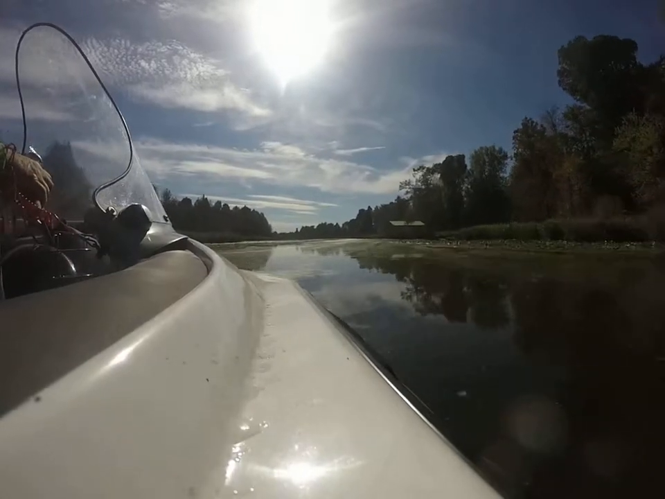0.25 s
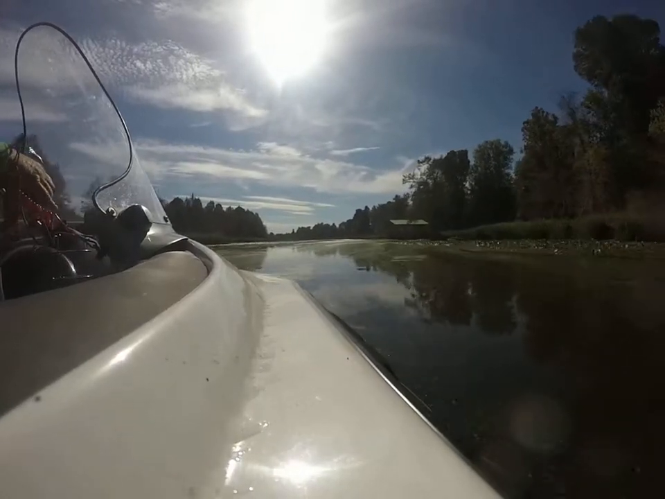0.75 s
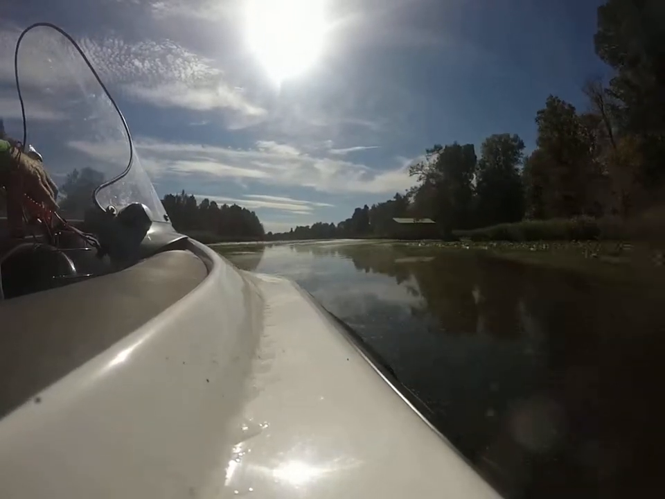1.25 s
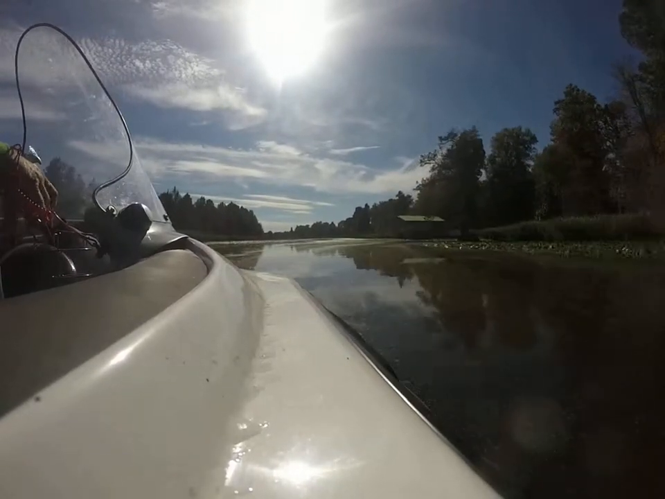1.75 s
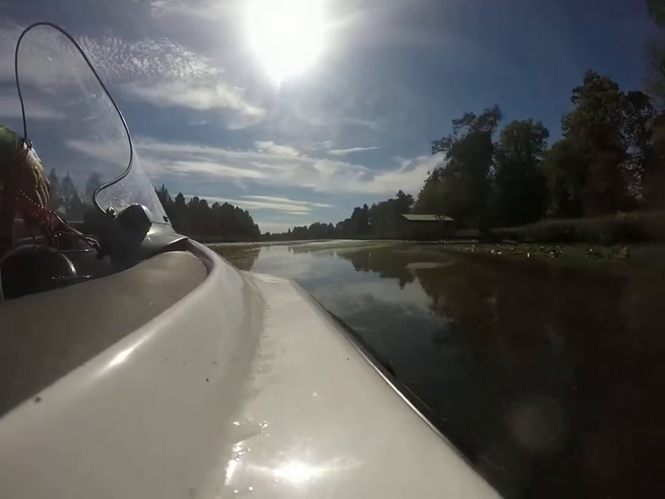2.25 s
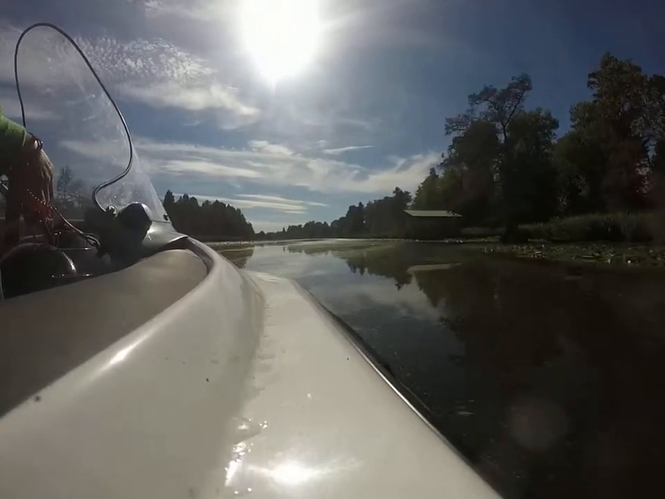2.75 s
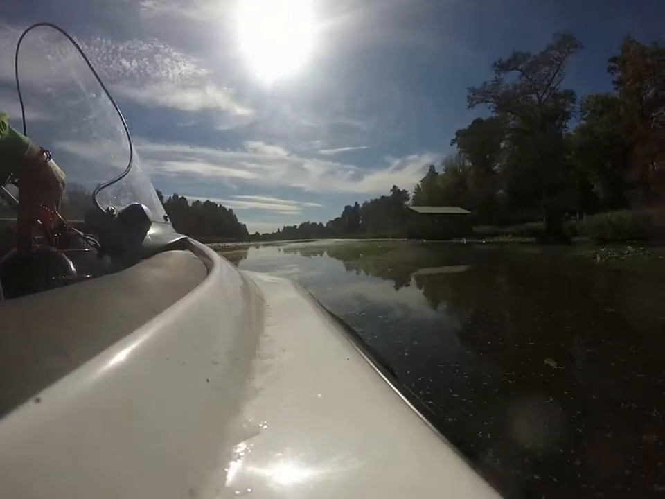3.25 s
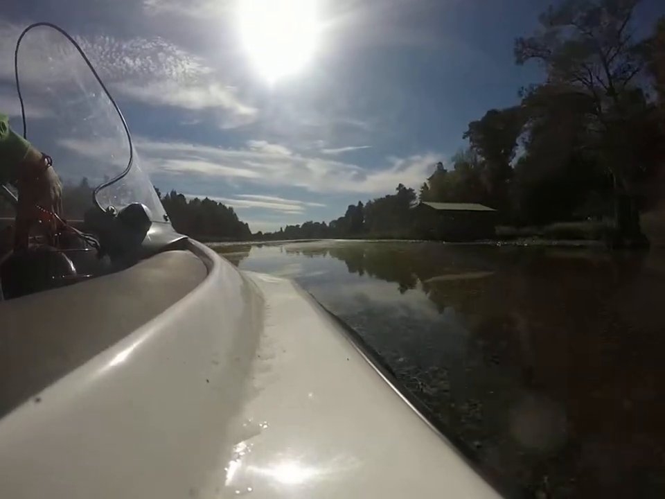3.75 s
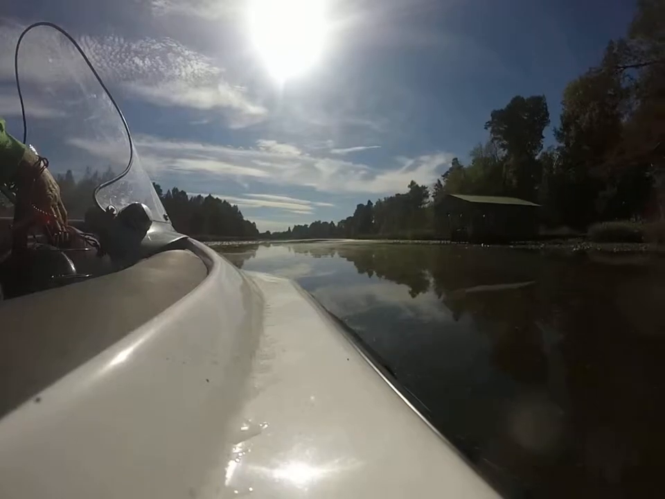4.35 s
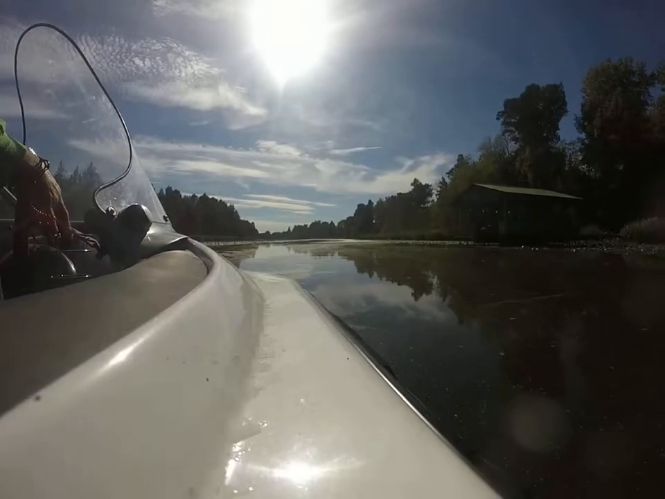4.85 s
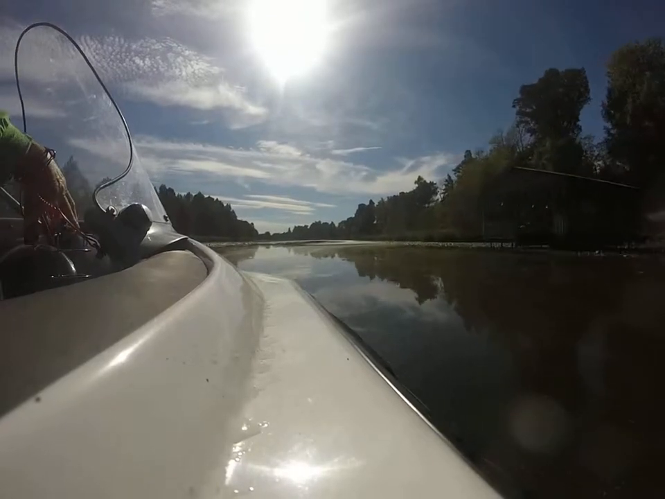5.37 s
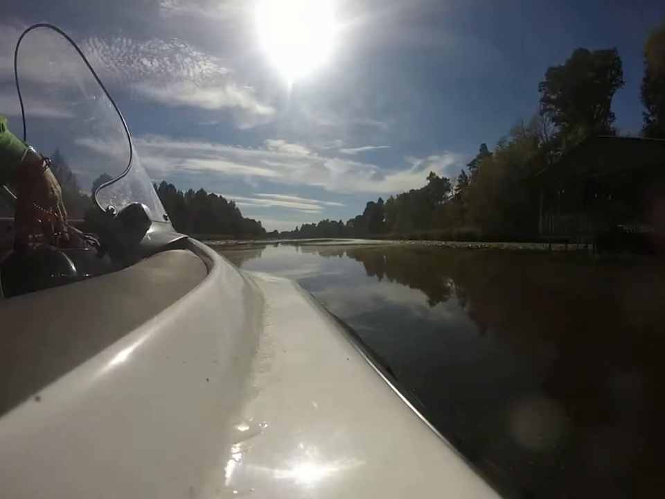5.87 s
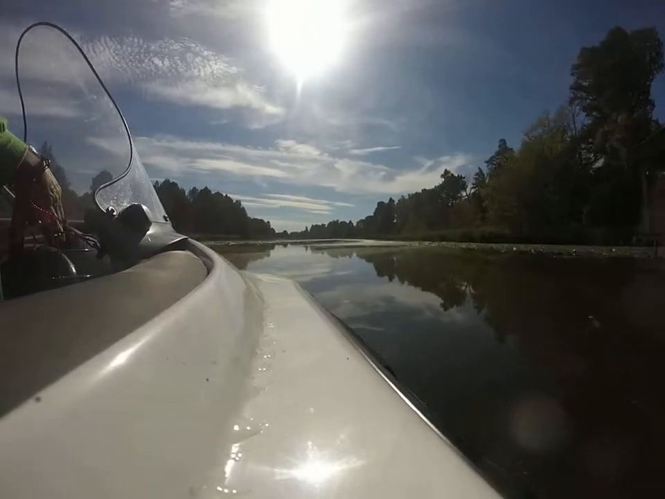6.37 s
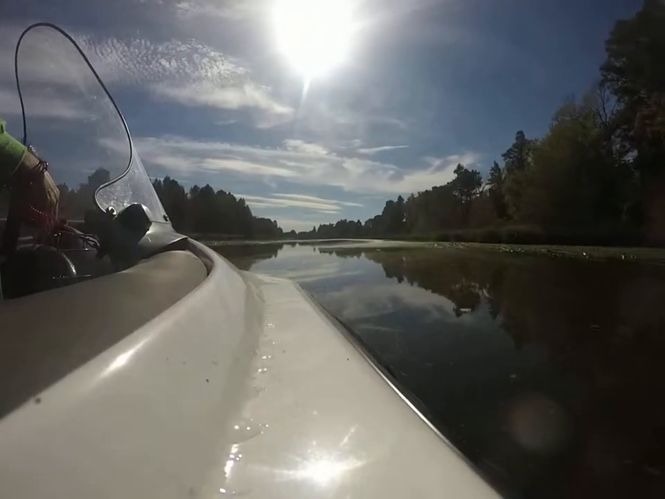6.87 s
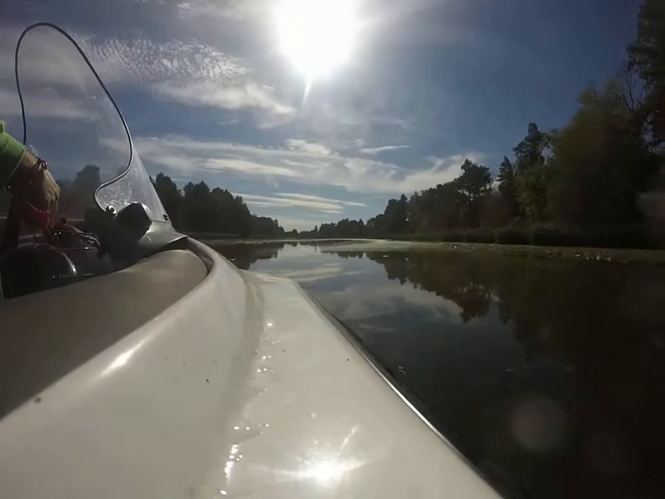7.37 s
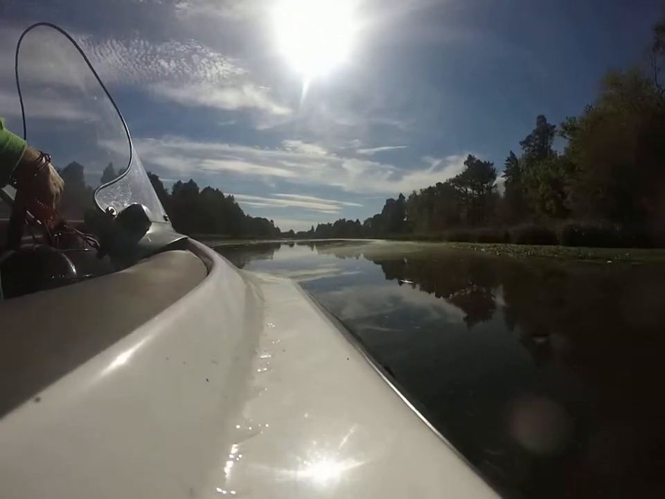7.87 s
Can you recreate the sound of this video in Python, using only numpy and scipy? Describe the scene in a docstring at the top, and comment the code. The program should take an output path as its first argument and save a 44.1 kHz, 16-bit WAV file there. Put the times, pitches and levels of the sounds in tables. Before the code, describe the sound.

Close, unbroken hovercraft drone: strong low engine hum, buzzing fan tone and airy duct rush, rising very slightly in pitch partway through.

```python
"""The two-cylinder four-stroke engine of a small hovercraft drones as it cruises over calm water.
The microphone sits in a closed housing on the hull, close to everything. The engine turns a seven-blade
ducted fan through a toothed belt, so engine and fan sound as sums of sines tied to one changing speed.
Below them the air cushion booms, above them air rushes through the duct: both are flickering shaped noise.
The valve gear clatters as brighter noise, with a loudness pattern that returns each engine cycle."""
import sys
import numpy as np
from scipy import signal
from scipy.fft import rfft, irfft, next_fast_len
from scipy.io import wavfile
from scipy.ndimage import uniform_filter1d

SR = 44100
rng = np.random.default_rng(int(sys.argv[2]) if len(sys.argv) > 2 else 0)


def master(y):
    """Save y as 16-bit WAV."""
    cut = np.clip(np.atleast_2d(y).T, -1, 1)
    pcm = np.round(cut * 32767)  # scale
    wavfile.write(sys.argv[1], SR, pcm.astype(np.int16))


def invert_db(level):
    """Linear amplitude ratio for a level in decibels (20 dB per decade), elementwise."""
    return 10 ** (np.asarray(level, dtype=float) / 20)


N = 358091   # length in samples
BLADES, ENGINE_TEETH, FAN_TEETH = 7, 25, 64   # fan blades; belt teeth on each pulley


def drift(corner_hz):
    """Slow chance of spread 1: noise at every 40th sample through two equal one-pole low-passes."""
    pole = np.exp(-2 * np.pi * corner_hz * 40 / SR)
    noise = rng.standard_normal(N // 40 + 2002)
    slow = signal.lfilter([1], [1, -2 * pole, pole * pole], noise)[2000:]   # settled part
    return np.interp(np.arange(N) / 40, np.arange(len(slow)), slow / slow.std())


def in_time(rows):
    """Reads the second column of a time curve at every sample."""
    time_s, value = np.transpose(rows)
    return np.interp(np.arange(N) / SR, time_s, value)


def between(slow, fast, speed):
    """Blends from the value at the lowest speed (speed 0) to that at the highest (speed 1)."""
    return slow + speed * (fast - slow)


def peak(pitch_hz, centre_hz, width_hz):
    """A resonance curve: 1 at its centre, half that one width away."""
    return 1 / (1 + ((pitch_hz - centre_hz) / width_hz) ** 2)


def coloured(spectrum, together, flicker_scale_db, flicker_corner_hz):
    """Noise of the given density in overlapping octave bands that flicker partly together, partly alone."""
    size = next_fast_len(N)
    octave = np.log2(np.arange(1, size // 2 + 2) * SR / size)
    hz, density_db = np.transpose(spectrum)
    gain = invert_db(np.interp(octave, np.log2(hz), density_db)) * np.sqrt(SR / 2)
    shaped = rfft(rng.standard_normal(size)) * gain
    out = np.zeros(N)
    for centre in range(int(np.log2(hz[0])), int(np.log2(hz[-1])) + 2):
        weight = np.clip(1 - abs(octave - centre), 0, 1)
        band = irfft(shaped * weight, size)[:N]
        flicker = 0.75 * together + 0.37 * drift(flicker_corner_hz)
        out += band * invert_db(flicker_scale_db * flicker)
    return out


def level_in(x, low_hz, high_hz):
    """Scales a sound to rms 1 within a band."""
    sos = signal.butter(4, [low_hz, high_hz], "band", fs=SR, output="sos")
    return x / signal.sosfilt(sos, x).std()


def tone(turns, level_db, waver_db, wobble_rad):
    """A sine on a shaft angle, level in dB rms; uneven running makes level and phase wander."""
    phase = 2 * np.pi * turns + wobble_rad * drift(6.1)
    return np.sqrt(2) * invert_db(level_db + waver_db * drift(8.7)) * np.cos(phase)


# boom of the air cushion under the hull: pitch_hz [Hz], density_db [dB per Hz]
CUSHION_SPECTRUM = [(10, -71.5), (26, -58.5), (42, -48), (49, -43.5), (53, -35.5), (57, -31.5), (60, -33.5),
                    (64, -42), (76, -42), (92, -53), (130, -51), (160, -58), (215, -66), (320, -76),
                    (600, -100)]


def cushion():
    """The air held under the hull booms as low noise that flickers slowly."""
    return coloured(CUSHION_SPECTRUM, drift(3.0), flicker_scale_db=0.8, flicker_corner_hz=3.0)


# colour of the air in the duct, relative: pitch_hz [Hz], density_db [dB per Hz]
RUSH_SPECTRUM = [(120, -20.5), (250, -1.5), (400, -3), (560, -1), (660, -3), (720, -2), (870, -4.5),
                 (940, 1), (1050, -1), (1350, .5), (1690, -0.5), (1830, -4.5), (1900, -4), (2950, -10.5),
                 (3150, -6.5), (3520, -6.5), (3750, -16), (4500, -26.5), (7000, -48.5)]


def duct_rush(gusts, level_db):
    """Air streaming through the duct makes broad noise, shaken by turbulence."""
    noise = coloured(RUSH_SPECTRUM, gusts, flicker_scale_db=0.95, flicker_corner_hz=31.0)
    return invert_db(level_db) * level_in(noise, 900, 3800)


# colour of the clatter heard through the housing, relative: pitch_hz [Hz], density_db [dB per Hz]
CLATTER_SPECTRUM = [(3000, -17.5), (4200, 1.5), (4850, -2), (5100, -6.5), (5600, 0), (5900, -6), (6100, -3),
                    (6800, -11.5), (7250, -8), (7660, -3.5), (8400, -14.5), (10700, -15.5), (12300, -26.5),
                    (12850, -22.5), (13600, -29.5), (16000, -32.5)]
# clatter pattern through one engine cycle, before chance scales it: cycle_part [0 to 1], swing_db [dB]
VALVE_PATTERN = [(0, -3), (.17, -6), (.45, 2.5), (.58, -1), (.82, 5), (1, -0.5)]
VALVE_SPLIT_HZ, LOWER_SHARE = 10200, 0.31   # below the split this share of the swing is heard


def valve_clatter(cycles, gusts, level_db):
    """Valve gear makes bright noise; its highest part swells and sinks most with each engine cycle."""
    cycle_part, swing_db = np.transpose(VALVE_PATTERN)
    unlike = np.clip(1 + 0.4 * drift(6.0), 0, 2)   # no two cycles alike
    beat_db = np.interp(cycles % 1, cycle_part, swing_db) * unlike
    noise = coloured(CLATTER_SPECTRUM, gusts, flicker_scale_db=1.06, flicker_corner_hz=16.0)
    split = signal.butter(2, VALVE_SPLIT_HZ, "high", fs=SR, output="sos")
    top = signal.sosfiltfilt(split, noise)
    beating = top * invert_db(beat_db) + (noise - top) * invert_db(LOWER_SHARE * beat_db)
    return invert_db(level_db) * level_in(beating, 4500, 11000)


# other fan lines: multiple [of the shaft speed, used to the nearest whole],
# slow_db [dB rms at the lowest speed], fast_db [dB rms at the highest]
FAN_LINES = [(1, -47.5, -45.5), (5, -40, -43.5), (14, -49.5, -63), (21, -53.5, -57), (62.9, -74.5, -50.5)]
# the blade tone is fullest at one pitch
BLADE_DB, BLADE_PEAK_DB, BLADE_RING_HZ, BLADE_RING_WIDTH_HZ = -24, 1.8, 182.3, 1.5
# the belt whine rises where it meets a ring of the duct
BELT_DB, BELT_PEAK_DB, BELT_RING_HZ, BELT_RING_WIDTH_HZ = -59, 9, 1680, 13


def fan(turns, blade_hz, speed):
    """Blades pass the duct vanes; unlike blades add shaft multiples; belt teeth whine on the pulley."""
    blade_db = BLADE_DB + BLADE_PEAK_DB * peak(blade_hz, BLADE_RING_HZ, BLADE_RING_WIDTH_HZ)
    out = tone(BLADES * turns, blade_db, waver_db=0.9, wobble_rad=0.036)
    belt_hz = blade_hz * FAN_TEETH / BLADES
    belt_db = BELT_DB + BELT_PEAK_DB * peak(belt_hz, BELT_RING_HZ, BELT_RING_WIDTH_HZ)
    out += tone(FAN_TEETH * turns, belt_db, waver_db=1.8, wobble_rad=0.4)
    for multiple, slow_db, fast_db in FAN_LINES:
        level_db = between(slow_db, fast_db, speed)
        out += tone(round(multiple) * turns, level_db, waver_db=2.0, wobble_rad=0.15)
    return out


# other engine lines: multiple [of the four-stroke cycle],
# slow_db [dB rms at the lowest speed], fast_db [dB rms at the highest]
ENGINE_LINES = [(1, -29, -27), (5, -48.5, -42.5), (6, -43, -45.5), (7, -57, -50.5), (8, -45.5, -45.5),
                (9, -51, -48.5), (10, -56, -58.5), (12, -51.5, -54.5), (13, -57, -58.5), (15, -57, -60),
                (16, -61.5, -58.5)]
FIRING_SLOW_DB, FIRING_FAST_DB = -10.5, -11   # main hum at the lowest and highest speed
LOAD_DIP_DB = 0.35   # the hum sinks while speed is gained: dB for each blade pass per s gained in a second
# engine multiples share one pulse; the cushion's boom just below the hum shifts the hum ahead
HUM_LEAD_TURNS = 0.19   # in turns of the hum
THIRD_DB, FOURTH_DB = -26.5, -28   # third multiple before the hull, fourth multiple
# the hull passes the third multiple except near this pitch, where only a share is left
HULL_NULL_HZ, HULL_NULL_WIDTH_HZ, HULL_NULL_SHARE = 97.63, 2.0, 0.2


def engine(cycles, cycle_hz, speed, gaining):
    """Two firings a cycle give the main hum; unequal cylinders fill in the other multiples."""
    hum_db = between(FIRING_SLOW_DB, FIRING_FAST_DB, speed) - LOAD_DIP_DB * gaining
    out = tone(2 * cycles + HUM_LEAD_TURNS, hum_db, waver_db=0.1, wobble_rad=0.019)
    off_hz = 3 * cycle_hz - HULL_NULL_HZ
    left_hz = np.hypot(off_hz, HULL_NULL_SHARE * HULL_NULL_WIDTH_HZ)
    passed = left_hz / np.hypot(off_hz, HULL_NULL_WIDTH_HZ)
    out += passed * tone(3 * cycles, THIRD_DB, waver_db=0.8, wobble_rad=0.08)
    out += tone(4 * cycles, FOURTH_DB, waver_db=1.5, wobble_rad=0.08)
    for multiple, slow_db, fast_db in ENGINE_LINES:
        level_db = between(slow_db, fast_db, speed)
        out += tone(multiple * cycles, level_db, waver_db=1.0, wobble_rad=0.1)
    return out


# speed of the craft's fan: time_s [s], blade_hz [blade passes per s]
FAN_SPEED = [(0.2, 178.95), (0.55, 179.31), (1.25, 178.26), (1.95, 178.31), (2.3, 177.76), (2.65, 178.16),
             (3.35, 181.17), (3.7, 181.92), (4.05, 181.84), (4.75, 183.02), (5.45, 183.48), (5.8, 183.32),
             (6.3, 183.45), (6.85, 184.51), (7.25, 184.95), (7.8, 184.9), (8.1, 184.5)]
# air flow through the duct, heard as the level of its rush: time_s [s], level_db [dB]
DUCT_FLOW = [(0.1, -33.8), (.9, -34), (1.35, -35.5), (1.75, -35.5), (1.9, -34), (2.35, -34.5), (2.5, -33.5),
             (2.8, -33), (3.25, -34.4), (3.5, -33.5), (4.55, -33.5), (5.0, -33.5), (5.9, -35), (6.2, -33.5),
             (6.8, -34.5), (7.3, -33.5), (7.6, -33.5), (8.05, -34)]
SWELL_DB, SWELL_CORNER_HZ = 0.81, 7.6   # the rush also swells and sinks by chance
# clatter at the lowest and highest speed; share of the rush's swing that it follows
CLATTER_SLOW_DB, CLATTER_FAST_DB, CLATTER_FOLLOWS = -53, -51, 0.76


def scene():
    """Engine and fan share one speed through the belt; cushion, rush and clatter join them."""
    blade_hz = in_time(FAN_SPEED)
    fan_hz = blade_hz / BLADES
    cycle_hz = fan_hz * FAN_TEETH / ENGINE_TEETH / 2   # a four-stroke cycle takes two crank turns
    fan_turns = np.cumsum(fan_hz) / SR + rng.random()
    cycles = np.cumsum(cycle_hz) / SR + rng.random()
    speed = (blade_hz - blade_hz.min()) / np.ptp(blade_hz)   # 0 at the lowest, 1 at the highest
    gaining = uniform_filter1d(np.gradient(blade_hz) * SR, int(0.4 * SR))   # averaged over 0.4 s

    rush_db = in_time(DUCT_FLOW) + SWELL_DB * drift(SWELL_CORNER_HZ)
    clatter_db = between(CLATTER_SLOW_DB, CLATTER_FAST_DB, speed)
    clatter_db = clatter_db + CLATTER_FOLLOWS * (rush_db - rush_db.mean())
    gusts = drift(13.0)   # turbulence round the housing shakes rush and clatter at once

    air = cushion() + duct_rush(gusts, rush_db)
    machine = valve_clatter(cycles, gusts, clatter_db) + fan(fan_turns, blade_hz, speed)
    mix = air + machine + engine(cycles, cycle_hz, speed, gaining)
    return mix[None]   # one channel


def top_cut(x):
    """Nothing passes above the cut-off."""
    return signal.sosfilt(signal.butter(12, 15140, fs=SR, output="sos"), x)


OVERLOAD = 2.8   # ceiling of the microphone stage, in full scales


def record(dry):
    """The loud hum drives the microphone into gentle overload, which rounds the peaks."""
    rounded = OVERLOAD * np.tanh(dry / OVERLOAD)
    return top_cut(rounded)


dry = scene()
out = record(dry)
master(out)
```